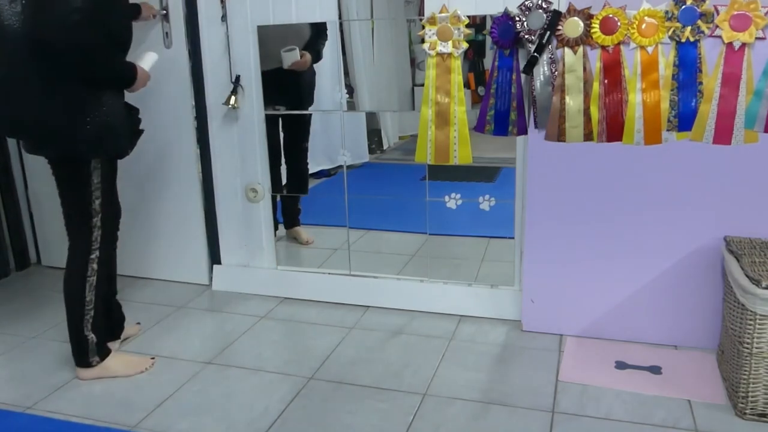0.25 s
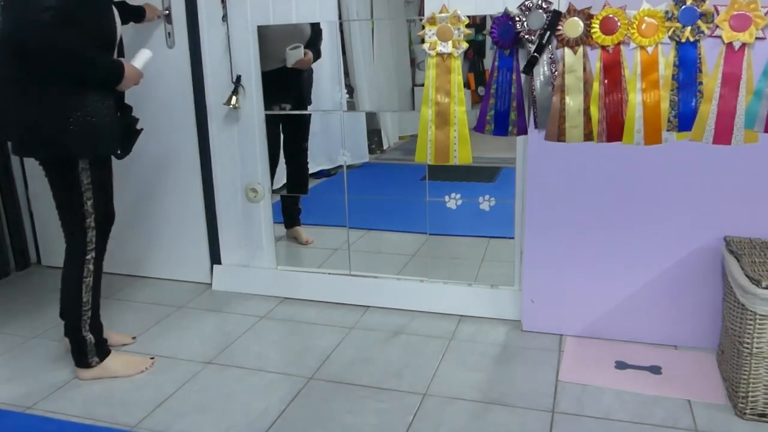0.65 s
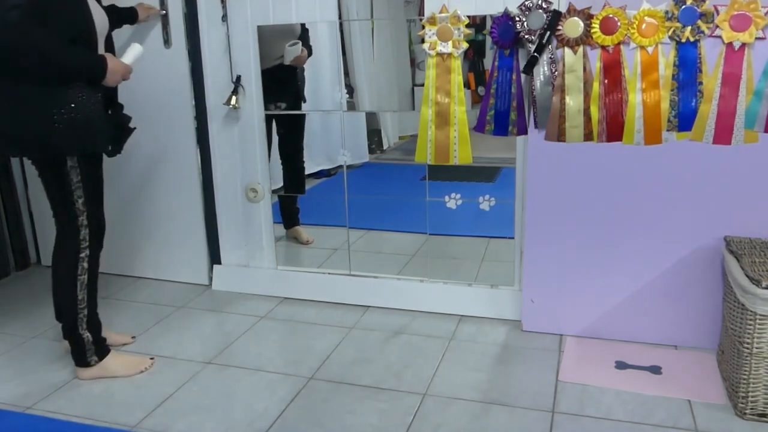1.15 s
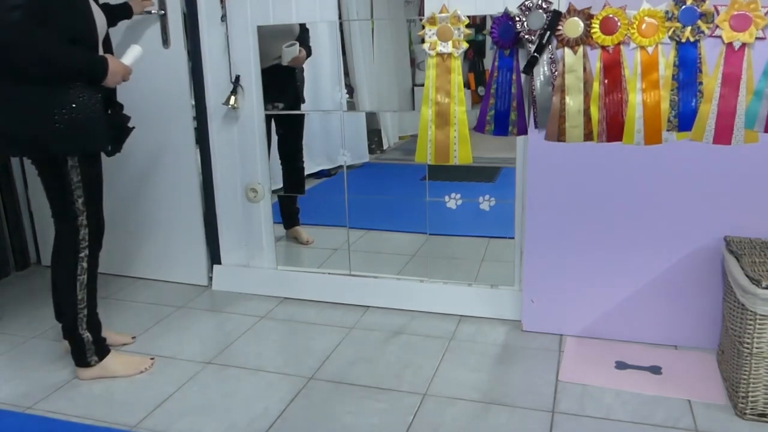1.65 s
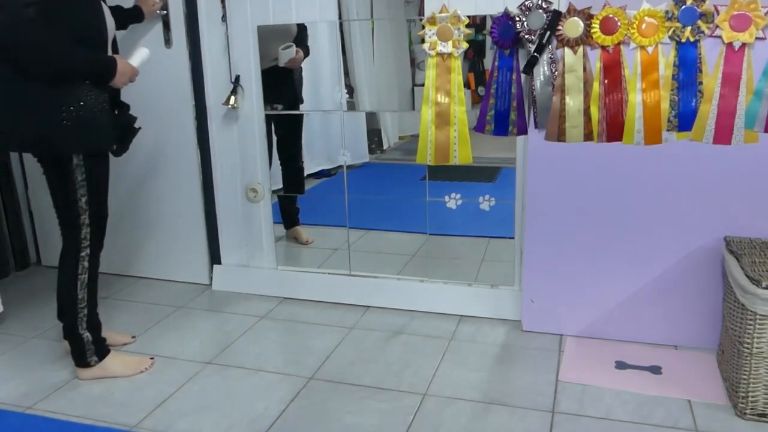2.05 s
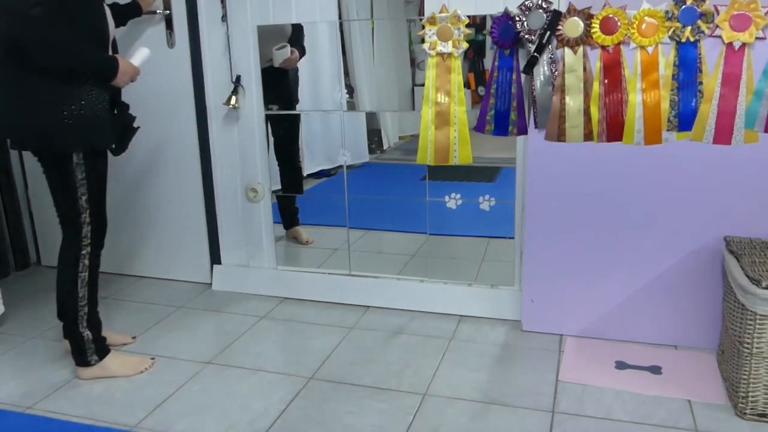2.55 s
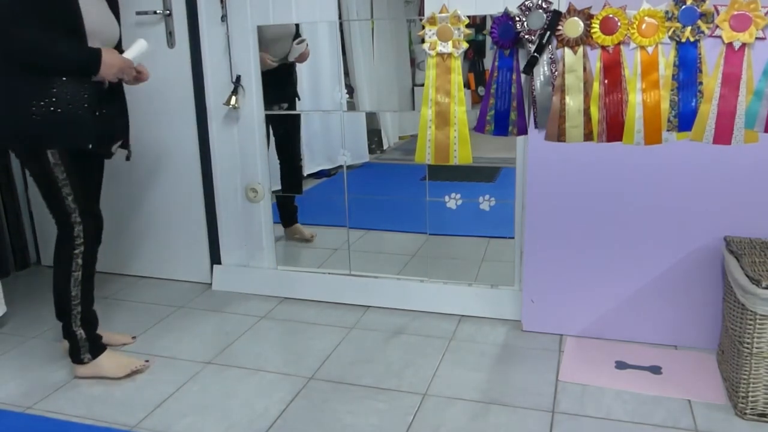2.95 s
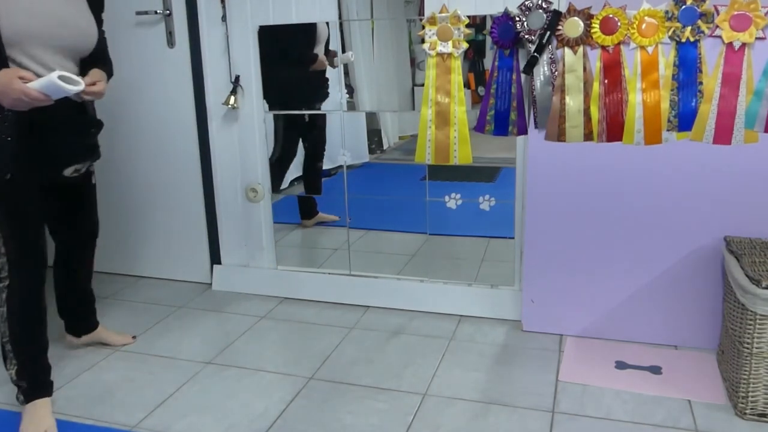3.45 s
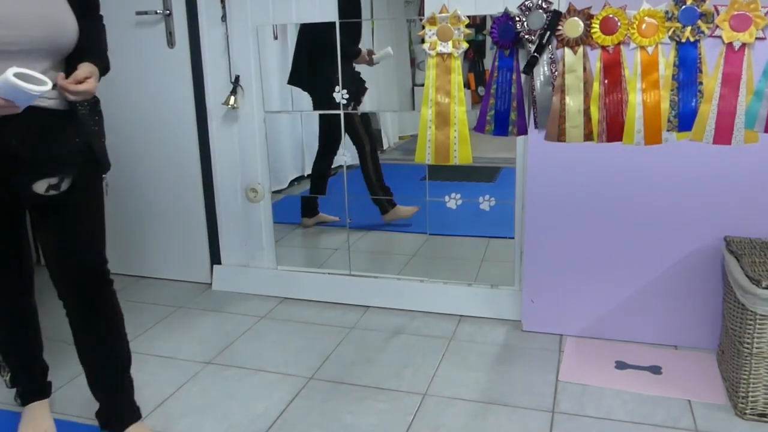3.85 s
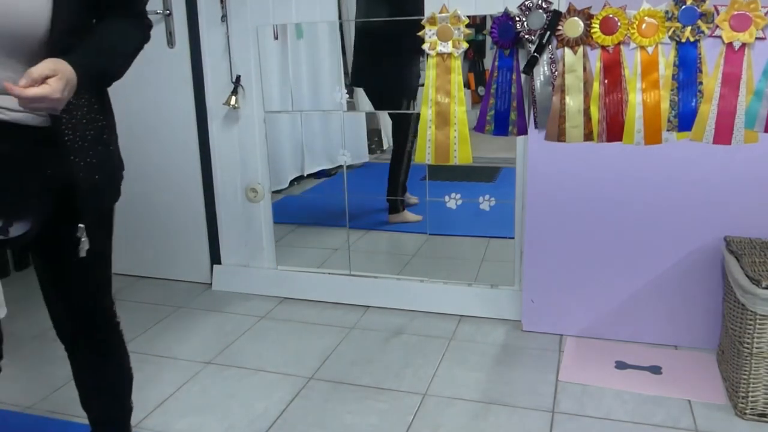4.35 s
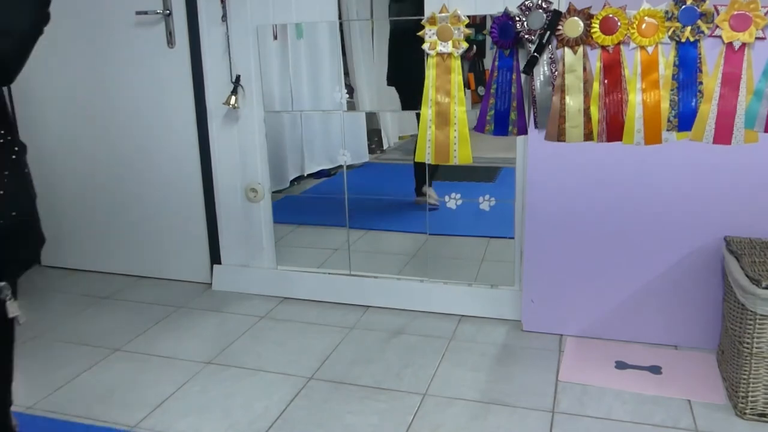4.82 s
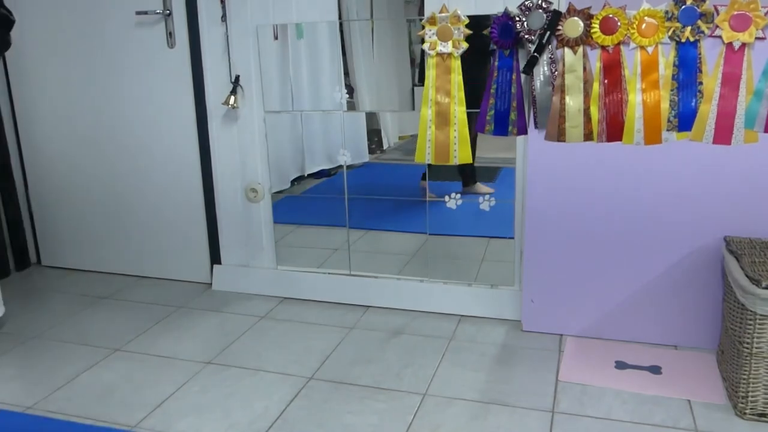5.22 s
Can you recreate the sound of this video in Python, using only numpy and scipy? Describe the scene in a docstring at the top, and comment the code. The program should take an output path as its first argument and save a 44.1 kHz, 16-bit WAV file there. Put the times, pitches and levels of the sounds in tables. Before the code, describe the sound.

A door creaks, its latch clacks, and it bangs shut in a tiled room; then someone walks softly away barefoot, clothes rustling.

```python
"""An inside door is pulled shut in a tiled room: it creaks in slow stick-slip jerks, its steel handle
and latch clack, it creaks twice more, then bangs into its frame and leaves the room's low modes booming.
Someone walks off, clothes rubbing, bare soles brushing the floor and squeaking once.
A tiny metal zip pull ticks, mostly during the walk, and a faint hiss lies under it all."""
import sys
import numpy as np
from scipy import signal
from scipy.fft import rfft, irfft, next_fast_len
from scipy.io import wavfile
from scipy.ndimage import uniform_filter1d

SR = 44100
rng = np.random.default_rng(int(sys.argv[2]) if len(sys.argv) > 2 else 0)


def transcribe(signal):
    """Save signal, clipped to [-1, 1], as a 16-bit WAV file at the path in sys.argv[1]."""
    frames = np.atleast_2d(signal).T
    limited = np.clip(frames, -1, 1)
    pcm = np.round(limited * 32767).astype(np.int16)
    wavfile.write(sys.argv[1], SR, pcm)


N = 241800
T = np.arange(SR // 2) / SR  # time axis of one hit, in seconds


def amp(db):
    """Decibels to gain."""
    return 10 ** (np.asarray(db) / 20)


def unit(x):
    """Scaled to rms 1."""
    return x / np.sqrt(np.mean(x ** 2) + 1e-20)


def unit_hit(x):
    """Scaled to the energy of 10 ms at rms 1."""
    return x * np.sqrt(SR / 100 / np.sum(x ** 2))


def fade(t60, t=T):
    """An exponential decay, 60 dB down after t60 seconds."""
    return np.exp(-np.log(1000) * t / t60)


def along(points, hz):
    """(Hz, value) points read on a log axis."""
    f, v = np.transpose(points)
    return np.interp(np.log(hz + 1), np.log(f), v)


def filtered(x, response):
    """EQ x with a response given as a function of frequency."""
    n = x.shape[-1]
    m = next_fast_len(n + SR // 8)
    return irfft(rfft(x, m) * response(np.fft.rfftfreq(m, 1 / SR)), m)[..., :n]


def low_cut(x, edge_hz):
    """A second-order high-pass."""
    return signal.sosfilt(signal.butter(2, edge_hz, "high", fs=SR, output="sos"), x)


def noise(spectrum, shape, tilt_db=0):
    """Coloured noise of rms 1, tilted per octave."""
    white = rng.standard_normal(shape)
    return unit(filtered(white, lambda hz: amp(along(spectrum, hz) + tilt_db * np.log2(hz + 1))))


def pulse(spectrum):
    """The shortest causal click with this spectrum."""
    cepstrum = irfft(np.log(amp(along(spectrum, np.fft.rfftfreq(SR, 1 / SR)))))
    cepstrum[1:SR // 2] *= 2
    cepstrum[SR // 2:] = 0
    return unit_hit(irfft(np.exp(rfft(cepstrum))))


def resonances(f, modes):
    """Response of a few (Hz, width, dB) resonances with steep skirts."""
    return sum(amp(db) * (1j * f * width / (hz ** 2 - f * f + 1j * f * width)) ** 2
               for hz, width, db in modes)


def rattle(modes, t60):
    """A dying burst of rough contact heard through resonances."""
    burst = rng.standard_normal(len(T)) * fade(t60)
    return unit_hit(filtered(burst, lambda f: resonances(f, modes)))


def dying(x, t60s):
    """Each frequency of x dies at its own speed."""
    hz, t, bands = signal.stft(x, SR, nperseg=256)
    return signal.istft(bands * fade(along(t60s, hz)[:, None], t), SR)[1][..., :len(T)]


def series(start, gap, ratio, count):
    """Times of contacts whose gaps shrink or grow by a constant ratio."""
    return start + np.append(0, np.cumsum(gap * ratio ** np.arange(round(count) - 1)))


def add(track, s, sound):
    """Mix a sound into the track at time s."""
    part = track[max(round(s * SR), 0):][:len(sound)]
    part += sound[:len(part)]


def diffuse(pair, width):
    """Two unrelated signals as mid and side of a diffuse field."""
    side = filtered(pair[1], lambda hz: amp(along(width, hz)))
    return np.array([pair[0] + side, pair[0] - side])


# Reverb decay of the tiled room: f/Hz, t60/s
REVERB_DECAY = [(80, 0.75), (300, 0.46), (1000, 0.64), (2500, 0.38), (6000, 0.29), (14000, 0.18)]
# Stereo width of the reverb: f/Hz, side minus mid/dB
REVERB_WIDTH = [(60, -9), (200, -11), (500, -5), (1000, -5), (4000, -3), (14000, -0.5)]
def room(x, wet_db, left_db):
    """Direct sound plus the wash off tiles and walls, panned left by left_db."""
    tail = dying(rng.standard_normal((2, len(T))), REVERB_DECAY) * (1 - np.exp(-T / 0.00043))
    tail = diffuse(tail / np.linalg.norm(tail[0]), REVERB_WIDTH)
    wet = signal.fftconvolve(x[None], tail, axes=1)[:, :len(x)]
    return (x + amp(wet_db) * wet) * amp([[left_db / 2], [-left_db / 2]])


# Colour of the hiss: f/Hz, density/dB
HISS_EQ = [(15, -34), (25, -18), (166, -8), (190, -10), (223, -6.5), (451, -6.5), (1370, -16.5),
           (1940, -17.5), (2990, -22), (9840, -20.5), (16000, -23.5)]
# Its stereo width: f/Hz, side minus mid/dB
HISS_WIDTH = [(60, 1.5), (110, 10.5), (200, 11.5), (380, 8), (700, 6.5), (1290, 6.5), (2380, 2.5),
              (4400, -1.5), (8120, -5), (15000, -1)]
# Its fader ride: t/s, level/dB
HISS_RIDE = [(0, -59), (1.6, -62.5), (3, -61.5), (3.6, -62.5), (5.48, -60.5)]
def background_hiss():
    """Faint steady microphone hiss, wide in the bass."""
    level_db = np.interp(np.arange(N) / SR, *np.transpose(HISS_RIDE))
    hiss = low_cut(noise(HISS_EQ, (2, N)), edge_hz=27)
    return amp(level_db) * diffuse(hiss, HISS_WIDTH)


# Strong modes of the wooden door leaf: f/Hz, level/dB
LEAF_MODES = [(75, -4), (110, 2), (157, -7), (190, 2), (243, -10), (315, -1.5), (392, 5.5), (462, -2),
              (552, -7), (619, -13), (668, -7), (763, -6), (882, 0.5), (960, -7.5), (1109, -44),
              (1333, -11.5), (1520, -21.5)]
# Decay of its dense grain of weak modes: f/Hz, t60/s
GRAIN_DECAY = [(80, 0.59), (400, 0.2), (1500, 0.22), (5000, 0.055), (12000, 0.2)]
def leaf_ring(spectrum, modes_db, swell_s):
    """The leaf rings in strong modes among many weak ones, swelling as the bending wave spreads."""
    modes = np.zeros(len(T))
    for k, (hz, db) in enumerate(LEAF_MODES):
        gain = (-1) ** k * amp(db + rng.normal(0, 2.4))
        t60 = 0.32 * (400 / hz) ** 0.15
        modes += gain * fade(t60) * np.sin(2 * np.pi * hz * T)
    grain = dying(noise(spectrum, len(T)), GRAIN_DECAY)
    ring = unit_hit(grain) + amp(modes_db) * unit_hit(modes)
    return unit_hit(ring * (1 - np.exp(-T / swell_s)))


# The jerk as a slip lets go: f/Hz, density/dB
JERK_EQ = [(100, -10), (600, -2), (1500, 1), (2200, -5), (3000, -18), (8000, -32)]
# Its bright snap and the grit that leads it: f/Hz, density/dB
SNAP_EQ = [(500, -9), (2500, -2.5), (4000, 0), (7000, -5), (10000, -10.5), (16000, -17.5)]
# Its woody body: f/Hz, density/dB
SLIP_BODY_EQ = [(60, -2), (200, 7), (500, 9.5), (900, -1), (1600, -8), (2000, -15), (2400, -7), (2900, -27),
                (8000, -43)]
# Rhythm of each creak: start/s, first gap/s, ratio of successive gaps, number of slips
CREAK_RHYTHM = [(.032, .0525, .923, 8), (.7955, .0142, .93, 9), (1.0817, .019, 1.38, 7)]
# Dynamics of each creak: first slip/dB, second slip/dB, last slip/dB, low cut/Hz, leaf modes/dB
CREAK_DYNAMICS = [(-46.5, -40, -34.5, 23, 1), (-46, -43, -52.5, 265, -1.5), (-51, -54, -67.5, 270, -3)]
def creak():
    """Each slip's bright grit arrives a moment before its sharp jerk, since bending waves in the leaf carry
    treble faster; the jerk rings the leaf; light runs lose the low modes."""
    grit_lead_s = 0.0011
    snap_db, grit_db, body_db = -17, -10, 8.5  # relative to the jerk
    contact, wood = np.zeros((2, N))
    release = pulse(JERK_EQ) + amp(snap_db) * pulse(SNAP_EQ)
    for rhythm, (first_db, second_db, last_db, edge_hz, modes_db) in zip(CREAK_RHYTHM, CREAK_DYNAMICS):
        times = series(*rhythm)
        # once moving, the force changes steadily
        levels = np.append(first_db, np.linspace(second_db, last_db, len(times) - 1))
        for s, force in zip(times, amp(levels)):
            grit = unit_hit(noise(SNAP_EQ, len(T)) * fade(0.13))
            body = unit_hit(low_cut(leaf_ring(SLIP_BODY_EQ, modes_db, swell_s=0.0005), edge_hz))
            add(contact, s - grit_lead_s, force * amp(grit_db) * grit)
            add(contact, s, force * release)
            add(wood, s, force * amp(body_db) * body)
    return room(contact, wet_db=-4.5, left_db=1.5) + room(wood, wet_db=-12.5, left_db=1.0)


# Low modes that boom after each push: room modes, and at 98 Hz a mode of the door leaf: f/Hz, level/dB, t60/s
LOW_MODES = [(62.6, 0, 1.0), (68.2, -4, 1.0), (76, -11, .6), (98, -5, .62)]
# The leaf pumps the room's air: t/s, boom/dB, thud/dB
AIR_PUSHES = [(0.083, -57, -84), (0.387, -34, -36), (2.097, -26, -18.5)]
def boom():
    """The low end: the whole leaf thuds briefly, and close room modes beat as they die."""
    thud_hz, phase_rad = 160, 0.12  # the modes reach left and right a little out of step
    out, t = np.zeros((2, N)), np.arange(SR) / SR
    thud = unit_hit(np.sin(2 * np.pi * thud_hz * T) * fade(0.17) * (1 - np.exp(-T / 0.012)))
    for track, phase in zip(out, (phase_rad, -phase_rad)):
        ring = sum(amp(db) * fade(t60, t) * np.sin(2 * np.pi * hz * t + phase)
                   for hz, db, t60 in LOW_MODES)
        ring *= 1 - np.exp(-t / 0.017)
        for s, boom_db, thud_db in AIR_PUSHES:
            add(track, s, amp(boom_db) * ring)
            add(track, s, amp(thud_db) * thud)
    return out


# Clacks of handle and latch, and the leaf's soft low brush just before the slam:
# t/s, seating delay/s, steel/dB, tilt/dB per octave, bolt/dB, leaf/dB, leaf damping t60/s
DOOR_CONTACTS = [(.3597, 0.0035, -28.5, 0, -27, -18.5, 1), (.5515, 0.0072, -36, -2, -49, -30.5, 1),
                 (.712, 0.0063, -45.5, -8, -50.5, -37.5, 0.39),
                 (1.158, 0.0049, -55.5, 11.5, -62.5, -54, 0.36), (2.04, .008, -76, -5, -80, -52.5, 0.41),
                 (2.076, .005, -71, -4, -71, -31, 0.21), (2.089, .0035, -23.5, 0.5, -29.5, -22, .3)]
# Rhythm of the leaf's chatter: start/s, first gap/s, ratio of successive gaps, number of contacts
CHATTER_RHYTHM = [(.380, .013, 1.8, 4), (2.0985, .0098, .89, 5)]
# Its dynamics: first leaf/dB, last leaf/dB, steel/dB, tilt/dB per octave, leaf damping t60/s
CHATTER_DYNAMICS = [(-17, -27.5, -45, -5, 0.83), (-19.5, -29, -37.5, 3, 0.26)]
def door_contacts():
    """Each contact is a flam, touching then seating; after a hard one the leaf chatters on its frame."""
    for s, seat_s, steel_db, tilt_db, bolt_db, leaf_db, damping in DOOR_CONTACTS:
        yield s, steel_db - 2, tilt_db, bolt_db - 5, leaf_db - 4.5, damping  # the lighter touch
        yield s + seat_s, steel_db, tilt_db, bolt_db, leaf_db, damping
    for rhythm, (first_db, last_db, steel_db, tilt_db, damping) in zip(CHATTER_RHYTHM, CHATTER_DYNAMICS):
        times = series(*rhythm)
        bolt_db = steel_db - 21
        for s, leaf_db in zip(times, np.linspace(first_db, last_db, len(times))):
            yield s, steel_db, tilt_db, bolt_db, leaf_db, damping


# Clatter of the steel parts: f/Hz, density/dB
STEEL_EQ = [(200, -42), (700, -7.5), (1500, 2.5), (2400, 2), (3800, 0.5), (5500, 1.5), (8000, -4),
            (11000, -8), (15500, -17)]
# Ring of the latch bolt: f/Hz, width/Hz, level/dB
BOLT_MODES = [(3170, 450, 6), (3600, 700, 8.5), (4700, 380, 2.5), (5900, 220, 0.5)]
# Grain of the struck leaf: f/Hz, density/dB
WOOD_EQ = [(25, -14), (60, -11), (150, -6), (400, 4.5), (850, -3), (1150, -9), (2000, -12.5), (2800, -39),
           (5000, -20.5), (9000, -31), (16000, -50)]
def latch_and_slam():
    """Steel parts clatter at each contact, the bolt rings and the leaf takes the blow."""
    steel, wood = np.zeros((2, N)), np.zeros(N)
    for s, steel_db, tilt_db, bolt_db, leaf_db, damping in door_contacts():
        clatter = amp(steel_db) * unit_hit(noise(STEEL_EQ, len(T), tilt_db) * fade(0.047))
        bolt = amp(bolt_db) * rattle(BOLT_MODES, t60=0.025)
        # each contact takes its own paths round the room
        for track, clack in zip(steel, room(clatter + bolt, wet_db=-3.5, left_db=0.5)):
            add(track, s, clack)
        knock = leaf_ring(WOOD_EQ, modes_db=-3.0, swell_s=0.0033)
        add(wood, s, amp(leaf_db) * unit_hit(knock * fade(damping)))  # hand and frame damp the leaf
    return steel + room(wood, wet_db=-11, left_db=1.0)


# Ticks of the zip pull: t/s, click/dB, ring/dB
ZIP_TICKS = [(.662, -58.5, -68), (.913, -48.5, -51), (3.149, -44.5, -52), (3.176, -51, -60),
             (3.368, -47, -64), (3.6258, -48.5, -48), (3.871, -53.5, -67), (4.084, -54, -63),
             (4.314, -51.5, -50), (4.822, -50.5, -49), (4.893, -50, -69), (5.058, -52, -59),
             (5.112, -54, -52)]
# Colour of its click: f/Hz, density/dB
TICK_EQ = [(3000, -21.5), (7000, -11.5), (9500, 0.5), (11500, 0), (13000, -4), (15500, -3)]
# Ring of its tab: f/Hz, width/Hz, level/dB
TAB_MODES = [(13540, 900, 0)]
def zip_pull():
    """A tiny metal tab clicks, bounces once and rings briefly near one very high pitch."""
    bounce_s, bounce_db = 0.0055, -4.5
    out = np.zeros(N)
    for s, click_db, ring_db in ZIP_TICKS:
        for delay, force in ((0, 1), (bounce_s, amp(bounce_db))):
            click = unit_hit(noise(TICK_EQ, len(T)) * (fade(0.006) + amp(-12) * fade(0.06)))
            ring = rattle(TAB_MODES, t60=0.016)
            add(out, s + delay, force * (amp(click_db) * click + amp(ring_db) * ring))
    return room(out, wet_db=-1.5, left_db=0)


# Ring of the door frame: f/Hz, width/Hz, level/dB
FRAME_MODES = [(166.6, 31, -0.5), (395.3, 48, 0.5), (549, 9.9, -13)]
def frame_knock():
    """The slam knocks a short, round note out of the wooden frame."""
    out = np.zeros(N)
    add(out, s=2.097, sound=amp(-20.5) * rattle(FRAME_MODES, t60=0.16))
    return room(out, wet_db=-11.5, left_db=0.5)


def stroke(length, skew):
    """Envelope of a rub; with skew under 1 it swells quickly and eases off."""
    return np.sin(np.pi * np.minimum(T / length, 1) ** skew)


# The walker's leg moves: t/s, sole rub length/s, cloth/dB, sole/dB, sole centre/Hz
LEG_MOVES = [(3.271, 0.082, -56.5, -55.5, 3200), (3.463, 0.071, -67, -83, 3000),
             (3.92, 0.048, -59, -56.5, 2660), (3.971, 0.11, -67, -59.5, 2930),
             (4.119, 0.033, -51.5, -55, 2840), (4.451, 0.18, -62.5, -61.5, 2150),
             (4.64, 0.06, -61.5, -55.5, 3060), (4.917, 0.1, -65.5, -58, 2200),
             (5.049, 0.11, -58.5, -57, 2610), (5.188, 0.11, -59, -62, 2600), (5.282, 0.048, -58, -49, 2200)]
# Colour of rubbing cloth: f/Hz, density/dB
CLOTH_EQ = [(300, -5), (900, -1.5), (2500, -1), (5000, -0.5), (7500, -3.5), (9500, 0), (15500, -4.5)]
# Squeak of a foot on the floor: f/Hz, width/Hz, level/dB
SQUEAK_MODES = [(1250, 240, 0.5), (1610, 130, 6), (2070, 110, -2.5)]
def walking():
    """Each stride rubs the cloth and brushes a bare sole over the floor; one sole squeaks."""
    start_s, rise_s, rustle_db = 2.94, 1.1, -66.5  # the rustle between strides fades in
    roughness = unit(uniform_filter1d(rng.standard_normal(N), size=130))
    rubbing = amp(rustle_db) * np.sqrt(np.clip((np.arange(N) / SR - start_s) / rise_s, 0, 1))
    feet = np.zeros(N)
    for s, length, cloth_db, sole_db, hz in LEG_MOVES:
        add(rubbing, s, amp(cloth_db) * stroke(1.47 * length, skew=0.54))  # cloth outlasts the sole
        brush = unit(filtered(rng.standard_normal(len(T)), lambda f: resonances(f, [(hz, 0.75 * hz, 0)])))
        add(feet, s, amp(sole_db) * brush * stroke(length, skew=0.47))
    rustle = rubbing * unit(noise(CLOTH_EQ, N) * amp(3.5 * roughness))
    feet *= amp(0.77 * roughness)  # skin catches and lets go
    add(feet, s=4.526, sound=amp(-41.5) * rattle(SQUEAK_MODES, t60=0.12))
    return room(rustle, wet_db=-2, left_db=0.2) + room(feet, wet_db=-5.0, left_db=3.5)


def scene():
    """The mix: door, walker and faint hiss."""
    door = creak() + latch_and_slam() + frame_knock() + boom()
    return door + zip_pull() + walking() + background_hiss()


def record(dry):
    """Master EQ: roll off the deepest rumble and cut the very top steeply."""
    top_hz, slope_hz = 15800, 400
    return filtered(low_cut(dry, edge_hz=41), lambda hz: np.clip((top_hz - hz) / slope_hz + 0.5, 0, 1))


dry = scene()
out = record(dry)
transcribe(out)
```